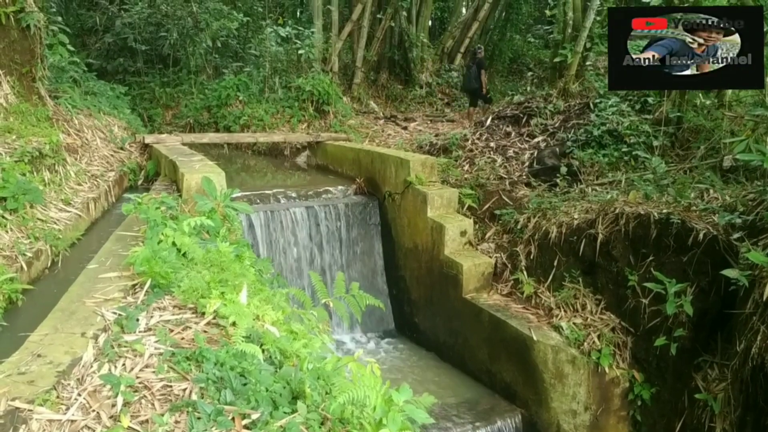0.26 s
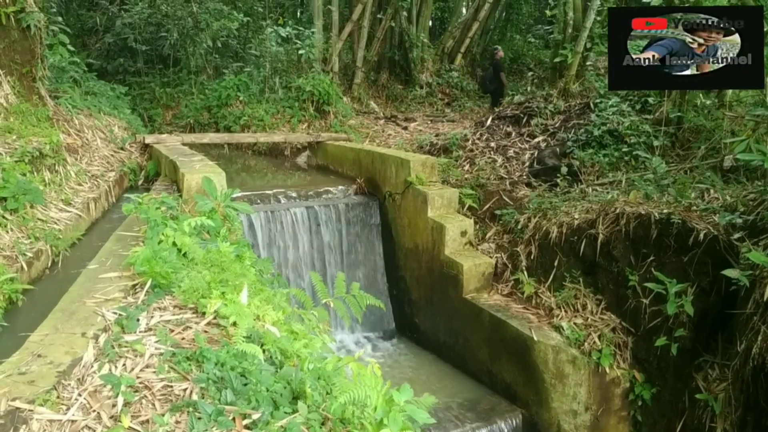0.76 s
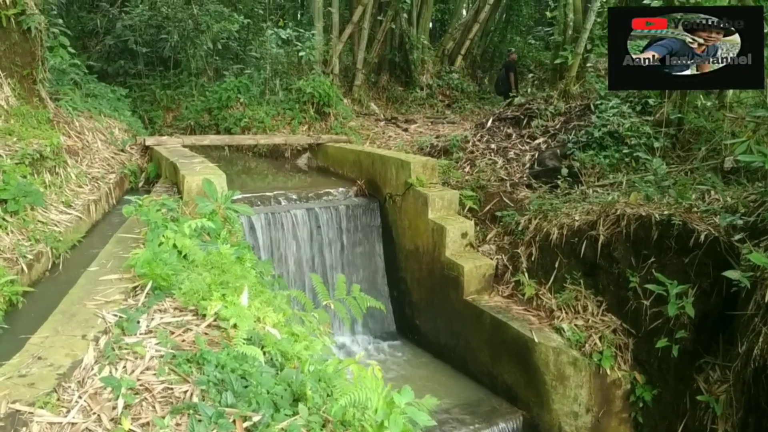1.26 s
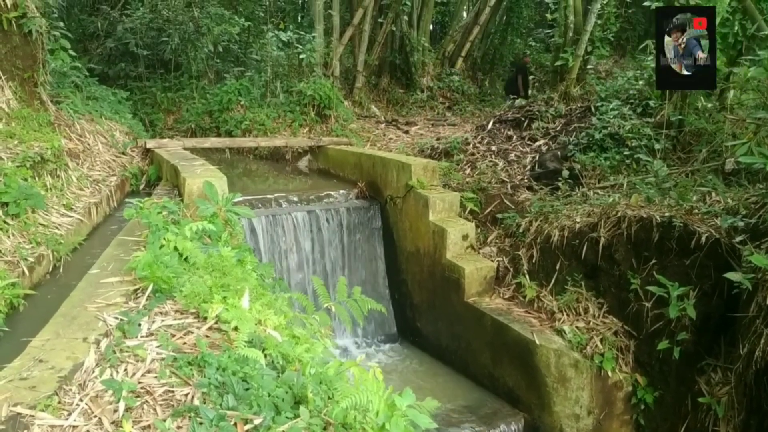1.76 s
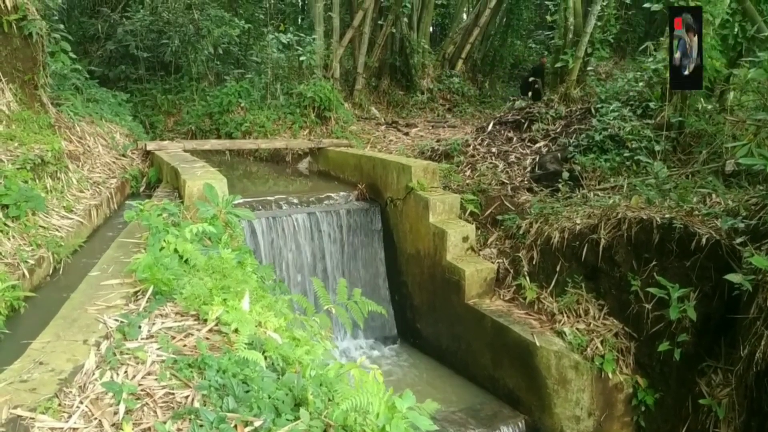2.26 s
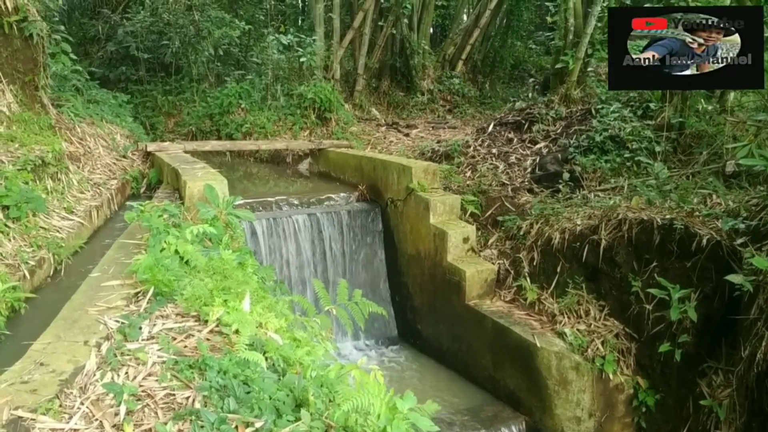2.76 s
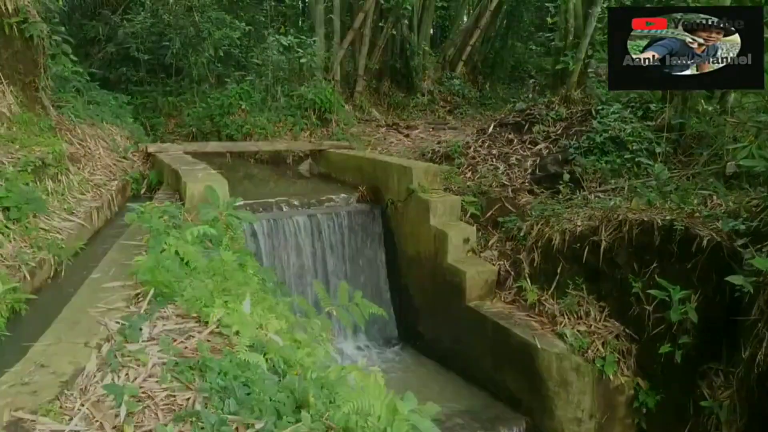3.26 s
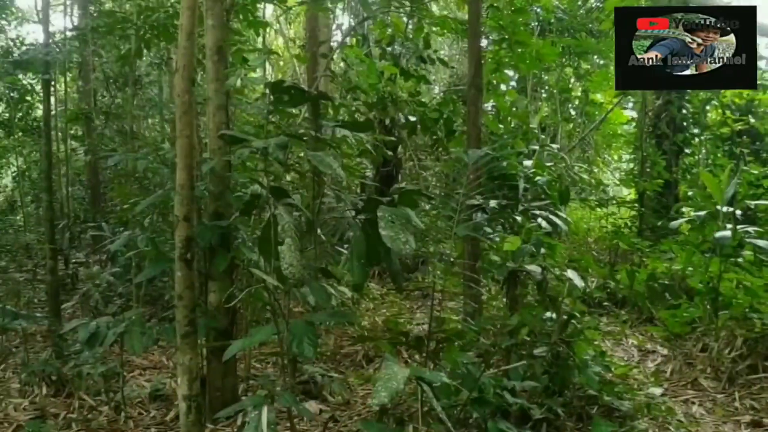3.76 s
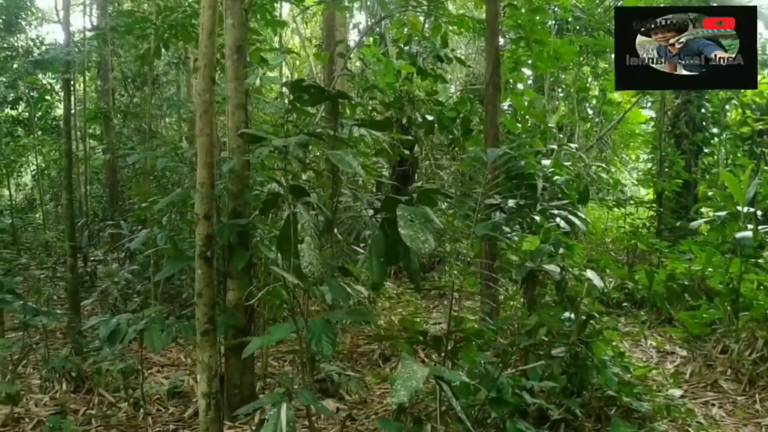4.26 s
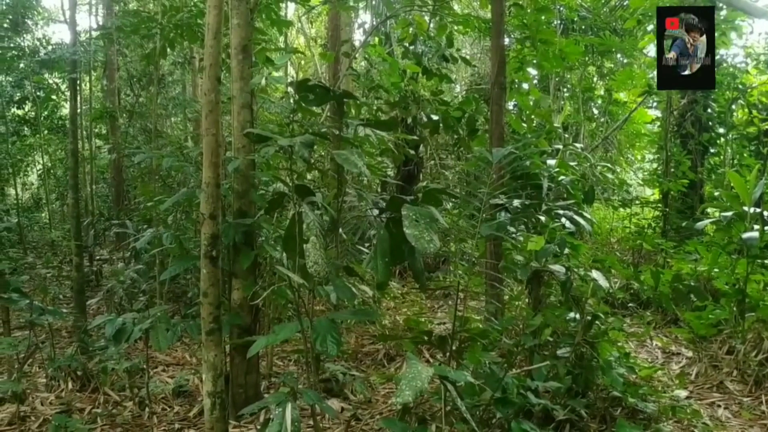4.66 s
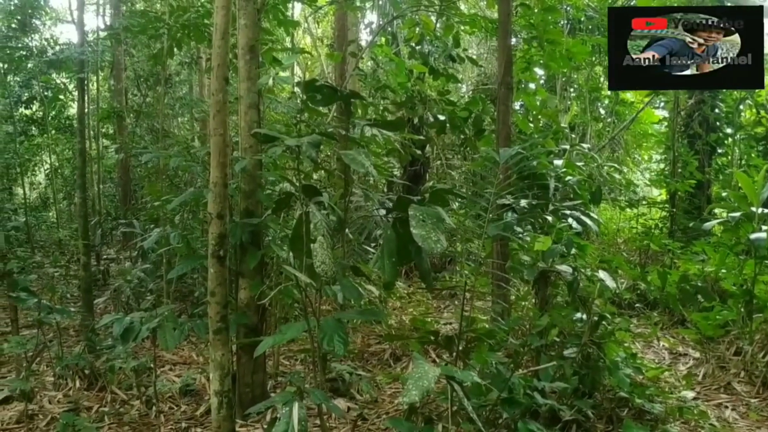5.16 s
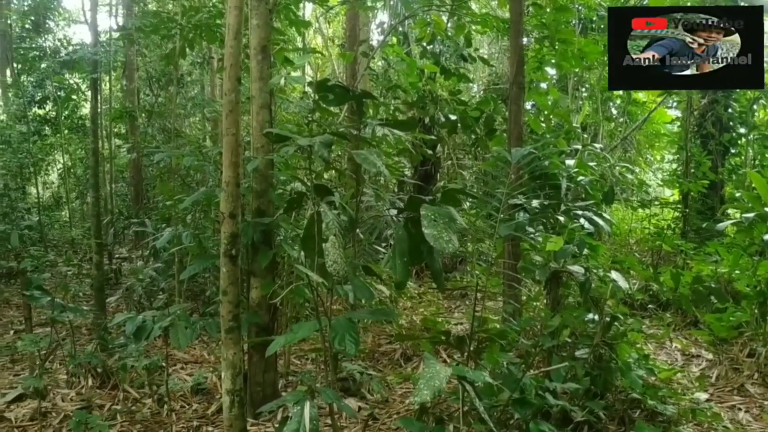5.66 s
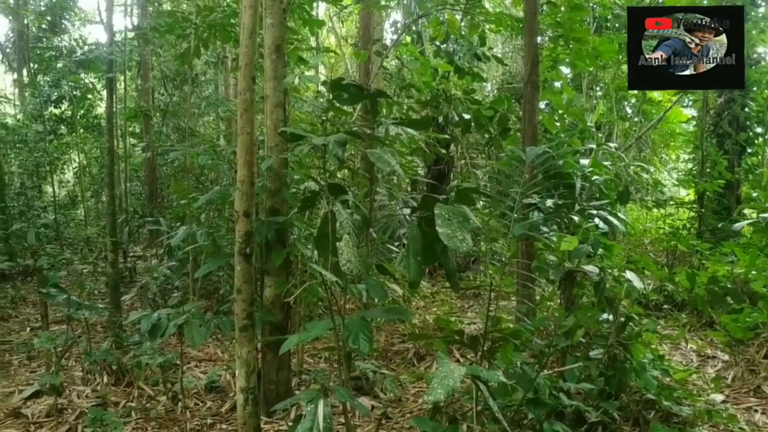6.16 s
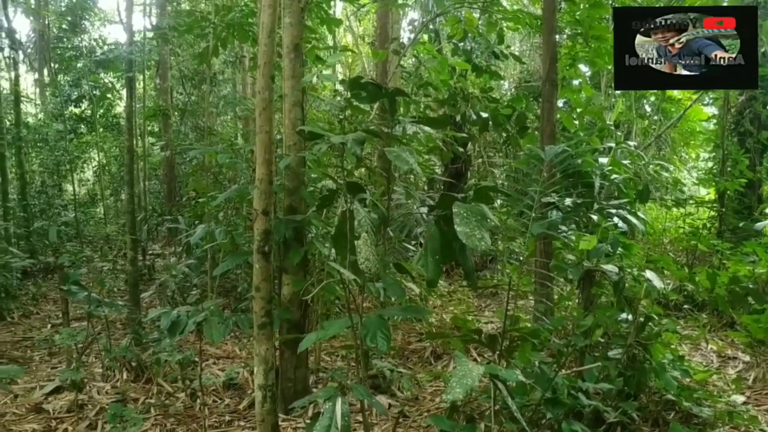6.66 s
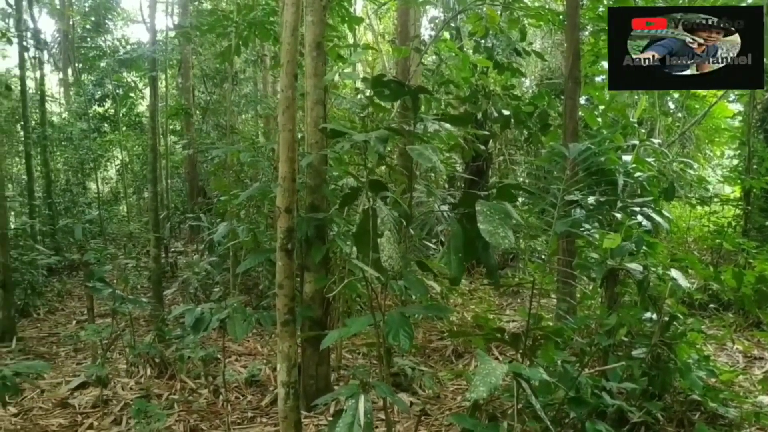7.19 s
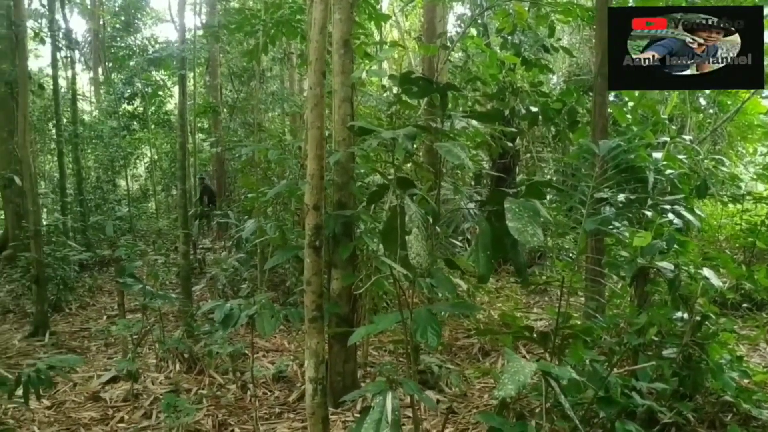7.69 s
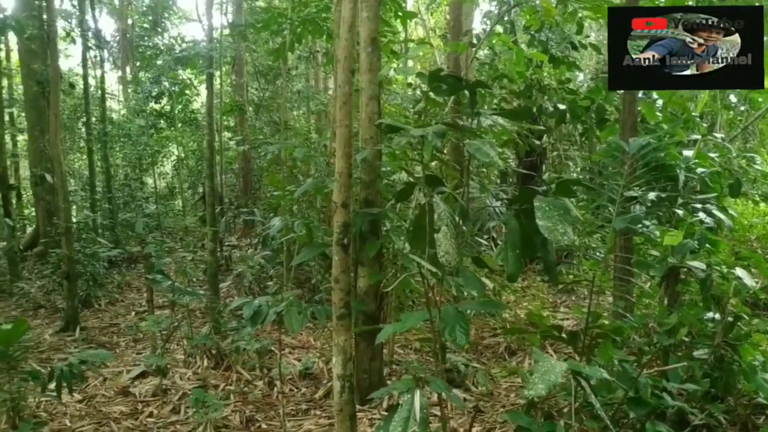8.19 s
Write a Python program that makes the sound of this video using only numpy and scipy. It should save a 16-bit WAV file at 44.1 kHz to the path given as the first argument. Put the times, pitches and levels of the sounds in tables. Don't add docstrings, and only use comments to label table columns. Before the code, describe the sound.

From 0 to about 3 seconds, water falling over a small concrete weir roars close to a stereo microphone pair: constant, dense, broadband, with mid-range weight, gurgling bubbles in the pool and fine bright spray, loud enough to round off the peaks. Between 3.0 and 3.5 seconds it fades away fast. From about 3.5 to 4 seconds a forest ambience fades in, much quieter: the same stream far away, a smooth, diffuse hiss-like rush with less treble and faint splashes, staying nearly steady to the end at about 8.4 seconds. From just after 4 seconds a distant idling engine comes out faintly beneath it, a low, wavering hum of several tones. Its upper tones become clearer around 5.8 seconds, then dull again, and near 7.2 seconds its pitch eases slightly lower.

```python
import sys
import numpy as np
from scipy import signal
from scipy.fft import rfft, irfft, next_fast_len
from scipy.io import wavfile
from scipy.ndimage import uniform_filter1d, map_coordinates

SR = 44100
rng = np.random.default_rng(int(sys.argv[2]) if len(sys.argv) > 2 else 0)


def voltage_ratio(decibels):
    exponent = np.asarray(decibels, float) / 20
    return 10 ** exponent


def log_audio(samples):
    frames = np.atleast_2d(samples).T
    limited = np.clip(frames, -1, 1)
    pcm = np.round(limited * 32767).astype(np.int16)
    wavfile.write(sys.argv[1], SR, pcm)


N = 371763
T = np.arange(N) / SR

FLOW_DRIFT = (-0.0548, 0.01)


def weir():
    # f/Hz, level/dB [per Hz]
    plunge_spectrum = [(24, -61), (40, -42), (122, -26.5), (161, -9), (196, -3.5), (435, -7.5), (681, -1),
                       (917, -4.5), (2300, -0.5), (3260, -5), (5780, -2), (8600, -6.5), (14100, -9.5),
                       (15200, -7.5)]
    # f/Hz, left-right level/dB
    wall_tilt = [(60, 11), (92, -4), (140, -3), (210, 1), (330, -1), (500, -1), (760, -0.5), (1160, 0.5),
                 (1780, 0.5), (2720, 1.5), (4150, -1.5), (6340, 4.5), (9680, -1.5), (14800, 2)]
    # f/Hz, correlation [-1 to 1]
    plunge_likeness = [(60, .1), (110, 0.88), (190, 1), (320, 1), (480, 0.71), (720, 0.55), (1100, 0.44),
                       (2000, 0.04)]

    pool = voltage_ratio(-16.0) * bubbles(count=9000, hz=861, spread=1.25, cycles=2.94, scatter_db=1.62)
    fizz = voltage_ratio(-25.0) * bubbles(count=4000, hz=6930, spread=0.75, cycles=2.7, scatter_db=2.0)
    splashing = patchy(patchy_db=0.3) + pool + fizz
    water = heard(splashing, plunge_spectrum, wall_tilt, plunge_likeness, lead_s=0.000181)
    return voltage_ratio(-6.0) * surging(water, FLOW_DRIFT[0], churn_db=0.1, spray_db=-0.3)


def forest():
    # f/Hz, level/dB [per Hz]
    distant_spectrum = [(24, -68), (40, -41), (100, -25), (129, -20.5), (153, -9.5), (234, -5), (258, -6),
                        (404, -8), (601, -7), (1400, -6), (2880, -5.5), (6870, -6.5), (15200, -16.5)]
    # f/Hz, left-right level/dB
    distant_tilt = [(60, 0.5), (180, -0.5), (540, 0.0), (1630, 1.5), (4910, 0.5), (14800, -1)]
    # f/Hz, correlation [-1 to 1]
    distant_likeness = [(60, 0.79), (160, 1), (290, 0.88), (450, 0.47), (700, 0.43), (1400, 0.51),
                        (1900, 0.3), (4000, 0.063)]

    splash = voltage_ratio(-18) * bubbles(count=8000, hz=3530, spread=1.415, cycles=3.8, scatter_db=2.5)
    rush = patchy(patchy_db=0.24) + splash
    water = heard(rush, distant_spectrum, distant_tilt, distant_likeness, lead_s=0.0003705)
    return voltage_ratio(-22.0) * surging(water, FLOW_DRIFT[1], churn_db=0.2, spray_db=0.3)


def engine():
    # order [multiple of firing rate], level/dB, share of the distance loss [0-1]
    exhaust_orders = [(5, -2.5, 0.08), (6, 0.5, 0.12), (7, -6, 0.1), (8, -2.5, 0.14), (9, -5.5, 0.46),
                      (10, 0.5, 0.8), (11, -3, 0.9)]
    idle_hz, ease_hz, ease_s, ease_lasts_s = 40.37, 1.5, 7.2, 0.474
    engine_db, hidden_db, emerge_s, emerge_lasts_s = -44, 17, 4.15, 0.6
    distance_loss_db, nearest_s, nearest_lasts_s = 12, 5.8, 0.68

    eased = (1 + np.tanh((T - ease_s) / ease_lasts_s)) / 2
    firing_phase = 2 * np.pi * np.cumsum(idle_hz - ease_hz * eased) / SR
    hidden = np.clip(1 - (T - emerge_s) / emerge_lasts_s, 0, 1)
    emerging_db = engine_db - hidden_db * hidden
    nearness = np.exp(-((T - nearest_s) / nearest_lasts_s) ** 2)
    distance_db = distance_loss_db * (1 - nearness)

    total = np.zeros(N)
    for order, order_db, loss_share in exhaust_orders:
        tone_db = order_db + emerging_db - distance_db * np.clip(loss_share, 0, 1)
        loudness = voltage_ratio(tone_db + 3.4 * wobble(4))
        total += loudness * np.sin(np.round(order) * firing_phase + 1.3 * wobble(5))
    return total


def patchy(patchy_db):
    z = signal.stft(rng.standard_normal((2, N)), nperseg=512)[2]
    patches = uniform_filter1d(rng.standard_normal(z.shape[1:]), size=8, axis=0)
    patches = uniform_filter1d(patches, size=10, axis=1)
    splashes = signal.istft(z * voltage_ratio(patchy_db * unit(patches)), nperseg=512)[1]
    return unit(splashes[:, :N])


def bubbles(count, hz, spread, cycles, scatter_db):
    length = 400
    draw = rng.random((count, 4))
    pitch = np.clip(hz * np.exp(spread * (2 * draw[:, 1:2] - 1)), 150, 14000)
    turns = pitch * np.arange(length) / SR
    rising = np.sin(2 * np.pi * turns * (1 + 0.12 * turns / cycles))
    ring = rising * np.exp(-turns / cycles) * (1 - np.exp(-2 * turns))
    ring *= voltage_ratio(-scatter_db * np.log(draw[:, 2:3] + 1e-4))
    ring *= np.hanning(2 * length)[length:]
    onset = (draw[:, :1] * N).astype(int)
    where = onset + np.arange(length) + (draw[:, 3:] > 0.5) * (N + length)
    streams = np.bincount(where.ravel(), ring.ravel(), 2 * (N + length))
    return unit(streams.reshape(2, -1)[:, :N])


def surging(water, drift_db_per_s, churn_db, spray_db):
    low = filtered(water, lambda hz: 1 / (1 + (hz / 2000) ** 4))
    flow_db = drift_db_per_s * (T - T.mean())
    shared = wobble(5.1)
    churn = 1.5 * flow_db + churn_db * (shared + wobble(11))
    spray = flow_db + spray_db * (shared + wobble(17))
    return unit(voltage_ratio(churn) * low + voltage_ratio(spray) * (water - low))


def heard(pair, spectrum, tilt, alike, lead_s):
    def blend_angle(hz):
        return np.arccos(np.clip(along(alike, hz), -1, 1)) / 2

    half = np.array([[0.5], [-0.5]])

    def microphone(hz):
        colour = voltage_ratio(along(spectrum, hz) + half * along(tilt, hz))
        return colour * np.exp(2j * np.pi * hz * lead_s * half)

    mid, side = filtered(pair, lambda hz: [np.cos(blend_angle(hz)), np.sin(blend_angle(hz))])
    return filtered(np.array([mid + side, mid - side]), microphone)


def overloaded(x):
    return x / (1 + np.abs(x / 1.1) ** 6) ** (1 / 6)


def thinned(x, valley):
    # f/Hz, exponent [1]
    thinning_curve = [(1000, 0.14), (2500, 0.16), (3600, 0.72), (5800, 0.67), (8000, 1.2), (11000, 1.9),
                      (15000, 0.86)]
    hz, _, z = signal.stft([x[0] + x[1], x[0] - x[1]], SR, nperseg=2048)
    power = uniform_filter1d(np.abs(z) ** 2, size=4, axis=2) + 1e-16
    near = uniform_filter1d(power, size=7, axis=1)
    around = uniform_filter1d(power, size=61, axis=1)
    prominence = np.minimum(np.abs(near / around), 1.3)
    exponent = along(thinning_curve, hz) + valley * np.exp(-((hz - 3600) / 700) ** 2)
    gain = prominence ** np.clip(exponent, 0, 6)[:, None]
    kept_power = np.sum(power * gain ** 2, axis=2, keepdims=True)
    gain /= np.sqrt(kept_power / np.sum(power, axis=2, keepdims=True))
    mid, side = signal.istft(z * gain, SR, nperseg=2048)[1][:, :N]
    return np.array([mid + side, mid - side]) / 2


def unit(x):
    return x / np.sqrt(np.mean(x ** 2) + 1e-20)


def along(points, hz):
    f, v = np.transpose(points)
    return np.interp(np.log(hz + 1), np.log(f + 1), v)


def wobble(rate):
    knots = rng.standard_normal(int(N / SR * 40) + 4)
    return map_coordinates(knots, [np.clip(rate, 0.1, 39) * T])


def filtered(x, response):
    m = next_fast_len(N + 8192)
    return irfft(rfft(x, m) * response(np.fft.rfftfreq(m, 1 / SR)), m)[..., :N]


def scene():
    # start t/s, end t/s
    fade_ramps = [
        (3.0, 3.491),
        (3.47, 4.01),
    ]
    at_weir = thinned(overloaded(weir()), valley=0.85)
    on_path = thinned(forest() + engine(), valley=0.3)
    return np.interp(T, fade_ramps[0], [1, 0]) * at_weir + np.interp(T, fade_ramps[1], [0, 1]) * on_path


def low_pass(x):
    return signal.sosfilt(signal.butter(12, 15380, fs=SR, output="sos"), x)


def record(dry):
    return low_pass(dry)


dry = scene()
out = record(dry)
log_audio(out)
```